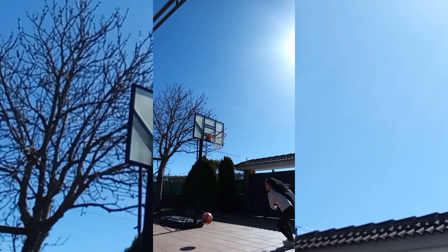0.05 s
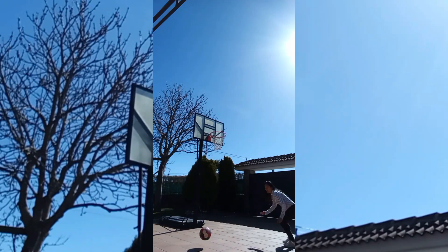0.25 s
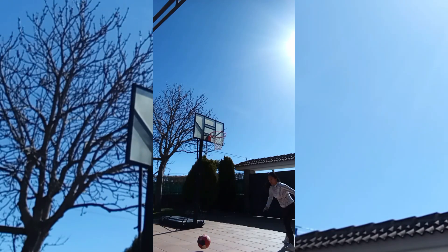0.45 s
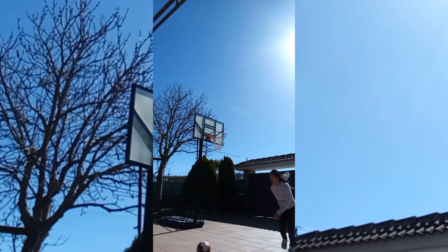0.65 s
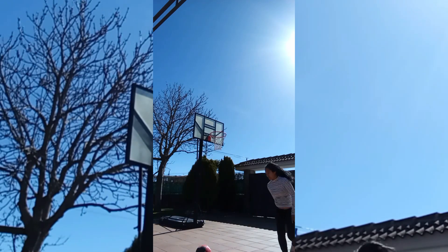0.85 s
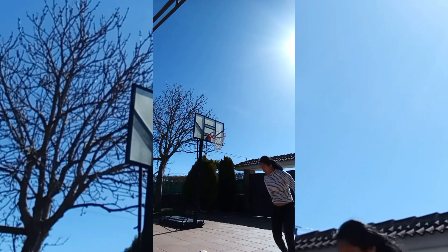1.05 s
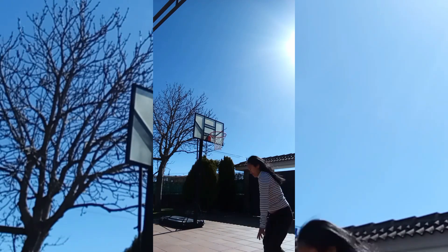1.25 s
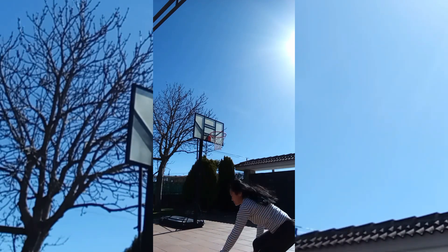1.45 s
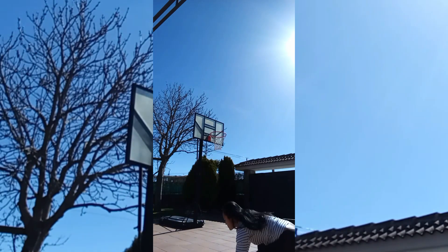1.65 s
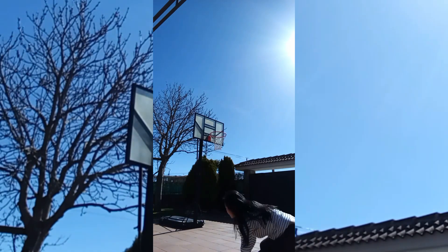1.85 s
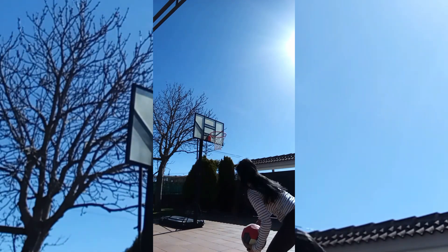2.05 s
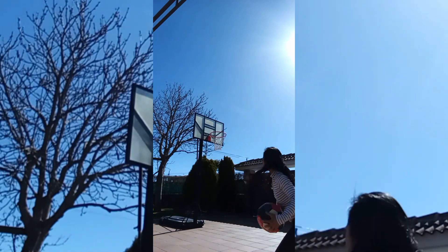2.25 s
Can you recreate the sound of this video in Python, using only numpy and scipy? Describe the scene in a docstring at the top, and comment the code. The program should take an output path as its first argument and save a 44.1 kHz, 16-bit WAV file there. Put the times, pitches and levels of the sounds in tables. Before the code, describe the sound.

Basketball bouncing hard then lighter on a patio, with scuffling steps and wind rumble.

```python
"""A basketball on a tiled patio, walls close by, the microphone out in the wind.
Over a faint outdoor hiss come a tap of grit, far whistles and a first gust rumbling on the microphone.
The ball slams down, rings and leaves the tiles with a low thump; the walls throw back quick echoes.
A second, lighter thump and slap follows, then the ball knocks on something hollow. Soles squeak, scuff
and stamp after it through more gusts and a thin rustle. Last, the hands gather the ball with a slap."""
import sys
import numpy as np
from scipy import signal
from scipy.fft import rfft, irfft
from scipy.io import wavfile
from scipy.ndimage import uniform_filter1d

SR = 44100
rng = np.random.default_rng(int(sys.argv[2]) if len(sys.argv) > 2 else 0)


def waveform_to_disk(signal):
    """Save audio, clipped to [-1, 1], as 16-bit WAV at the path in sys.argv[1]."""
    frames = np.transpose(np.atleast_2d(signal))
    scaled = np.clip(frames, -1, 1) * 32767
    samples = np.round(scaled).astype(np.int16)
    wavfile.write(sys.argv[1], SR, samples)


N = 101429
T = np.arange(N) / SR


def amp(db):
    return 10 ** (np.asarray(db) / 20)


def unit(x):
    """Scale to unit energy."""
    return x / np.sqrt(np.sum(x ** 2) + 1e-18)


def add(out, start, x):
    """Mix x in at start seconds."""
    i = max(int(round(start * SR)), 0)
    out[i:i + len(x)] += x[:max(len(out) - i, 0)]


def fall(t60):
    """Exponential decay, a quarter of a second long."""
    return np.exp(-np.log(1000) * T[:SR // 4] / max(t60, 1e-3))


def swell(start, length):
    """A rounded rise and fall."""
    return np.sqrt(np.abs(np.sin(np.pi * np.clip((T - start) / length, 0, 1))))


def band(x, hz, octaves, order=1):
    """Band-pass around hz."""
    edges = np.clip([hz * 2 ** (-octaves / 2), hz * 2 ** (octaves / 2)], 10, SR / 2 - 1)
    return signal.sosfilt(signal.butter(order, edges, "bandpass", fs=SR, output="sos"), x)


def colour(x, spectrum, size=2048):
    """Minimum-phase filter through (f/Hz, level/dB) points."""
    hz, db = np.array(spectrum, float).T
    grid = np.maximum(np.arange(size // 2 + 1) * SR / size, 1)
    gain = amp(np.interp(np.log(grid), np.log(hz), db))
    cepstrum = irfft(np.log(gain))
    cepstrum[1:size // 2] *= 2
    cepstrum[size // 2 + 1:] = 0
    return signal.fftconvolve(x, irfft(np.exp(rfft(cepstrum))))[:len(x)]


def noise(spectrum):
    """Steady coloured noise of rms 1."""
    return unit(colour(rng.standard_normal(N), spectrum)) * np.sqrt(N)


def crunch(t60, grain):
    """A click, then dying tiny contacts whose strength is grain."""
    env = fall(t60)
    out = grain * unit(env * rng.standard_normal(len(env)))
    out[0] += 1
    return out


def contact(spectrum, t60, grain):
    """A coloured crunch of unit energy."""
    return unit(colour(crunch(t60, grain), spectrum))


def ring(modes):
    """Damped modes struck together, alternating in sign."""
    t = T[:SR // 4]
    return sum((-1) ** k * amp(db) * fall(t60) * np.sin(2 * np.pi * hz * t)
               for k, (hz, db, t60) in enumerate(modes))


def wash(spectrum, t60, build_s):
    """Scattered reflections that build up and die away; unit energy."""
    env = fall(t60)
    env *= 1 - np.exp(-(T[:len(env)] / build_s) ** 2)
    return unit(colour(env * rng.standard_normal(len(env)), spectrum))


# Open air all around: f/Hz, level/dB
AIR_SPECTRUM = [(25, -3), (80, 10), (200, 5), (1200, -5), (2800, -17.5), (5200, -13), (7000, -8),
                (8000, -28.5), (13000, -31), (15300, -28.5)]
# Its level at the microphone: t/s, level/dB
AIR_CURVE = [(0, -64), (.45, -72), (.47, -82), (.515, -81.5), (.535, -69.5), (.9, -71.5), (1.655, -70.5),
             (1.68, -82.5), (1.76, -81.5), (1.8, -71.5), (2.3, -71.5)]
def air():
    """Faint outdoor hiss that dips briefly twice."""
    times, db = np.array(AIR_CURVE).T
    return noise(AIR_SPECTRUM) * amp(np.interp(T, times, db))


# Echoes off the nearby walls: delay/s, level/dB
WALL_ECHOES = [(.0190, -12.5), (0.0357, -11.5), (.0500, -17)]
# Scatter around the patio: f/Hz, level/dB
PATIO_SPECTRUM = [(80, 7), (300, -1.5), (7000, -3)]
def patio(x, wet_db):
    """The direct sound reaches the microphone first, then scatter and wall echoes."""
    response = wash(PATIO_SPECTRUM, t60=0.16, build_s=0.01)
    for delay, db in WALL_ECHOES:
        add(response, delay, amp([db]))
    return x + amp(wet_db) * signal.fftconvolve(x, unit(response))[:len(x)]


# Grit on the tiles: f/Hz, level/dB
GRIT_SPECTRUM = [(1500, -16.5), (4000, -8), (6800, 5.5), (8000, -13.5), (9800, -2), (13500, -29.5),
                 (15300, -6.5)]
# Taps at ground level: t/s, body level/dB, body f/Hz, grit level/dB
TILE_TAPS = [(.038, -37.5, 694, -48.5), (0.618, -42, 1010, -37), (.8388, -33, 1300, -41),
             (0.8436, -48, 1403, -41), (0.8608, -30.5, 770, -41), (0.935, -43, 1340, -52),
             (1.2503, -32.5, 1010, -57), (1.576, -43, 2350, -50.5), (2.034, -38, 2700, -43.5)]
def taps():
    """Shoe tips and loose grit tick on the tiles."""
    out = np.zeros(N)
    for start, body_db, hz, grit_db in TILE_TAPS:
        body = unit(band(crunch(t60=0.0078, grain=4.9), hz, octaves=0.98, order=2))
        grit = contact(GRIT_SPECTRUM, t60=0.0072, grain=1.0)
        add(out, start, patio(amp(body_db) * body + amp(grit_db) * grit, wet_db=-6))
    return out


# A sole rubbing on tile: f/Hz, level/dB
SOLE_SPECTRUM = [(70, -14), (170, 11), (700, 0), (1300, -11.5), (3000, -15), (5000, -25.5)]
# Slides across the patio: t/s, rise/s, t60/s, sole level/dB, grit level/dB
SLIDES = [(.05, 0.023, 0.1, -66.5, -82), (.797, 0.0022, 0.19, -59, -87), (1.081, 0.01, 0.07, -66, -66.5),
          (1.444, 0.011, 0.19, -52.5, -61.5), (1.572, 0.002, 0.3, -63, -76)]
def scuffs():
    """A sliding sole drags grit along; the friction noise rises fast and dies away."""
    out = np.zeros(N)
    for start, rise, t60, sole_db, grit_db in SLIDES:
        attack = np.clip((T - start) / rise, 0, 1)
        decay = np.exp(-np.log(1000) * np.maximum(T - start - rise, 0) / t60)
        friction = amp(sole_db) * noise(SOLE_SPECTRUM) + amp(grit_db) * noise(GRIT_SPECTRUM)
        out += attack * decay * friction
    return out


# Whistles far from the microphone: t/s, length/s, f/Hz, level/dB
FAR_NOTES = [(0.053, 0.075, 2480, -73.5), (.06, 0.066, 3070, -73.5), (0.177, 0.038, 3270, -73.5),
             (0.617, 0.12, 3780, -79.5), (0.948, 0.092, 3820, -83.5), (1.208, 0.054, 3830, -85.5)]
def whistles(width_hz=150):
    """Thin birdlike notes, blurred by distance into narrow bands of noise."""
    out = np.zeros(N)
    for start, length, hz, db in FAR_NOTES:
        note = band(rng.standard_normal(N), hz, np.log2(1 + width_hz / hz), order=2)
        out += amp(db) * swell(start, length) * unit(note) * np.sqrt(N)
    return out


# Gusts right on the microphone: t/s, length/s, level/dB
MIC_GUSTS = [(0.119, 0.088, -52), (.25, .085, -51.5), (0.367, 0.026, -54.5), (0.425, 0.022, -59),
             (1.126, 0.16, -71.5), (1.373, .13, -53.5), (1.534, 0.0873, -48), (1.767, 0.258, -51),
             (2.19, 0.077, -63)]
# Their rumble: f/Hz, level/dB
WIND_SPECTRUM = [(20, -51.5), (40, -24), (58, -1), (95, 0.5), (130, -8.5), (200, -17), (300, -37.5),
                 (800, -71)]
# Single buffets: t/s, f/Hz, level/dB, half length/s
MIC_BUFFETS = [(1.3662, 112, -34.5, 0.0044), (1.452, 116, -43.5, 0.012), (1.868, 126, -34, 0.0053),
               (1.96, 101, -35, 0.013), (1.9870, 117, -32, 0.0052)]
def wind(edge_s=0.016):
    """Gusts rumble on the microphone; a few eddies strike it as single thuds."""
    def ramp(t):
        return np.clip(t / edge_s + 0.5, 0, 1)
    force = sum(amp(db) * ramp(T - start) * ramp(start + length - T) for start, length, db in MIC_GUSTS)
    eddies = noise(WIND_SPECTRUM)
    running_rms = np.sqrt(uniform_filter1d(eddies ** 2, size=1800) + 1e-9)
    out = force * eddies / running_rms
    for centre, hz, db, half_length in MIC_BUFFETS:
        t = T - centre
        out += amp(db) * np.exp(-(t / half_length) ** 2) * np.sin(2 * np.pi * hz * t)
    return out


# The ball's shell and air modes: f/Hz, level/dB, t60/s
BALL_RING = [(92, -7.5, 0.091), (228, 0.5, 0.062), (408, -1.5, 0.068), (503, -5.5, .05), (813, -8.5, .04),
             (1162, 2.5, 0.02), (1322, 0, 0.014), (2662, -13, 0.043), (3515, -6, 0.025), (4765, -9, 0.037),
             (6130, -4.5, 0.032), (6940, -11, 0.047)]
# Rubber cracking on tile: f/Hz, level/dB
CRACK_SPECTRUM = [(200, 3), (700, -15.5), (1400, 10.5), (1900, -11.5), (3300, -2.5), (4100, -11.5),
                  (6200, -2.5), (8000, -14), (9700, -10), (13500, -25.5), (15300, -15)]
# The bounce scattered around the patio: f/Hz, level/dB
BOUNCE_SCATTER = [(70, 12.5), (230, 1), (450, 5.5), (750, -10.5), (1300, 0), (2000, -7.5), (3100, -10),
                  (4100, -28.5), (6400, -11.5), (8000, -29.5), (9700, -25), (13000, -36.5)]
# A low thump as the ball leaves the tiles, then duller wall echoes: delay/s, level/dB, low-pass f/Hz
RELEASE_AND_ECHOES = [(.0100, -4.5, 265), (.0198, -7, 1700), (.0232, -4.5, 464), (.0308, -11.5, 2340),
                      (0.0396, -16, 1500), (0.053, -22, 3000)]
def bounce(start=0.2164, contact_s=0.0098):
    """The rubber cracks while pressed on the tiles; the ball rings, thumps as it leaves, and echoes."""
    out = np.zeros(N)
    pressing = np.exp(-(T[:SR // 4] / contact_s) ** 2)
    crack = unit(colour(pressing * rng.standard_normal(len(pressing)), CRACK_SPECTRUM))
    hit = amp(-29) * ring(BALL_RING) + amp(-9) * crack
    add(out, start, hit + amp(-11) * wash(BOUNCE_SCATTER, t60=0.24, build_s=0.02))
    for delay, db, cutoff_hz in RELEASE_AND_ECHOES:
        dulled = signal.lfilter(*signal.butter(1, cutoff_hz, fs=SR), hit)
        add(out, start + delay, amp(db) * dulled)
    return out


# A short scrape on tile: f/Hz, level/dB
SCRAPE_SPECTRUM = [(500, -21.5), (1800, -11.5), (2600, -2.5), (3400, -4), (4100, -14), (8000, -34.5)]
# A second, lighter thump and slap on the tiles, then footsteps: t/s, thump f/Hz, thump level/dB,
# slap f/Hz, slap level/dB, scrape level/dB, grit level/dB, contact t60/s, reflection level/dB
TILE_IMPACTS = [(0.5225, 334, -36.5, 653, -19.5, -19.5, -26.5, 0.024, -2),
                (1.1062, 243, -42, 746, -26, -37, -40, 0.11, -7),
                (1.3311, 333, -39.5, 890, -33.5, -39.5, -41.5, 0.025, -3),
                (1.8123, 393, -29, 1060, -23.5, -31, -30, 0.017, -10),
                (1.8270, 310, -36, 1075, -25.5, -34.5, -30, 0.032, -13)]
def tile_impacts():
    """Each landing thumps, slaps and scrapes, and grit crunches under it."""
    out = np.zeros(N)
    for start, hz, thump_db, slap_hz, slap_db, scrape_db, grit_db, t60, wet_db in TILE_IMPACTS:
        body = unit(band(crunch(t60, grain=1.57), hz, octaves=0.96, order=2))
        thump = ring([(hz, thump_db, 0.035)]) + amp(thump_db + 15.5) * body
        thump = signal.sosfilt(signal.butter(2, hz / 2, "highpass", fs=SR, output="sos"), thump)
        slap = band(crunch(t60, grain=3.6), slap_hz, octaves=0.37)
        slap = amp(slap_db) * unit(signal.lfilter(*signal.butter(2, 2 * slap_hz, fs=SR), slap))
        scrape = amp(scrape_db) * contact(SCRAPE_SPECTRUM, t60, grain=4.0)
        grit = amp(grit_db) * contact(GRIT_SPECTRUM, t60, grain=4.0)
        onset = 1 - fall(t60=0.0082)
        add(out, start, patio(-(thump + slap + scrape + grit) * onset, wet_db))
    return out


# Modes of something hollow on the patio: f/Hz, level/dB, t60/s
HOLLOW_MODES = [(437, -8, 0.073), (505, -2.5, 0.091), (1050, -3.5, 0.055), (1222, 7.5, 0.025),
                (1890, -11.5, 0.062), (2225, 2.5, 0.022), (2700, -6.5, 0.026), (3420, -10, 0.024)]
def knock(start=0.7003):
    """The ball meets something hollow: a light ringing knock with a soft onset."""
    out = np.zeros(N)
    tick = contact(GRIT_SPECTRUM, t60=0.03, grain=3.6)
    hit = amp(-42.5) * ring(HOLLOW_MODES) + amp(-29.5) * tick
    onset = 1 - fall(t60=0.012)
    add(out, start, patio(hit * onset, wet_db=-12.5))
    return out


# Slips on the tiles, heard almost dry: t/s, level/dB, t60/s
SLIPS = [(0.7957, -32, 0.02), (0.8037, -25, 0.02), (0.811, -30.5, 0.027)]
# Their shrill colour: f/Hz, level/dB
SQUEAK_SPECTRUM = [(3300, -32), (4400, -7), (5600, -20), (6850, 5), (8000, -17), (9600, -6), (12000, -17)]
def squeaks():
    """A sole squeaks in three short slips."""
    out = np.zeros(N)
    for start, db, t60 in SLIPS:
        add(out, start, patio(amp(db) * contact(SQUEAK_SPECTRUM, t60, grain=8.5), wet_db=-24))
    return out


# Faint rubs, heard dry: t/s, length/s, level/dB
RUBS = [(0.925, 0.13, -71), (1.309, 0.011, -74)]
# Their thin colour: f/Hz, level/dB
RUSTLE_SPECTRUM = [(4000, -27), (5800, 12), (7500, 6.5), (9000, -13), (10700, 8), (13300, -9), (14500, -1)]
def rustle(flutter_hz=140, flutter_db=5):
    """A bright rub whose level flutters at random."""
    knots = rng.standard_normal(2000)
    flutter = np.interp(T * flutter_hz, np.arange(len(knots)), knots)
    env = sum(amp(db) * swell(start, length) for start, length, db in RUBS)
    return noise(RUSTLE_SPECTRUM) * amp(flutter_db * flutter) * env


# Fingers, then palms, on the ball: t/s, level/dB
HAND_HITS = [(2.0562, -26), (2.0590, -10)]
# Skin on rubber: f/Hz, level/dB
PALM_SPECTRUM = [(80, -12), (300, -8), (450, -1), (720, 5), (1150, -4.5), (1900, -9), (2600, -25),
                 (4000, -11.5), (5200, -29), (8500, -40.5)]
# The slap scattered around the patio: f/Hz, level/dB
CATCH_SCATTER = [(100, -6.5), (480, -5.5), (720, 3.5), (1100, -6.5), (2600, -14), (6800, -12.5),
                 (8000, -26), (15300, -30)]
def catch():
    """Fingers touch, then the palms slap the ball and damp it at once; the walls answer."""
    out = np.zeros(N)
    for start, db in HAND_HITS:
        slap = amp(db) * contact(PALM_SPECTRUM, t60=0.018, grain=0.53)
        add(out, start, slap)
        for delay, wall_db in WALL_ECHOES:
            add(out, start + delay, amp(wall_db - 6.5) * slap)
    palms_s = HAND_HITS[-1][0]
    add(out, palms_s, amp(-20) * wash(CATCH_SCATTER, t60=0.18, build_s=0.0037))
    return out


def scene():
    """Everything as it reaches one microphone on the patio."""
    play = bounce() + knock() + tile_impacts() + taps() + squeaks() + scuffs() + rustle() + catch()
    outdoors = wind() + whistles() + air()
    return (play + outdoors)[None]


def record(dry, low_hz=32, top_hz=15900):
    """The recorder cuts the deepest bass and the top."""
    dry = signal.sosfilt(signal.butter(2, low_hz, "highpass", fs=SR, output="sos"), dry)
    return signal.sosfilt(signal.ellip(8, 0.2, 70, top_hz, fs=SR, output="sos"), dry)


dry = scene()
out = record(dry)
waveform_to_disk(out)
```